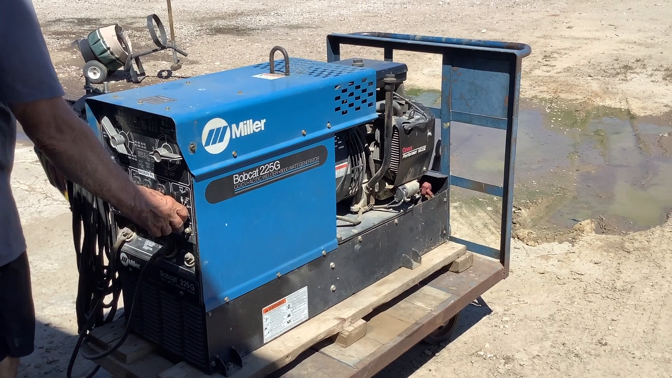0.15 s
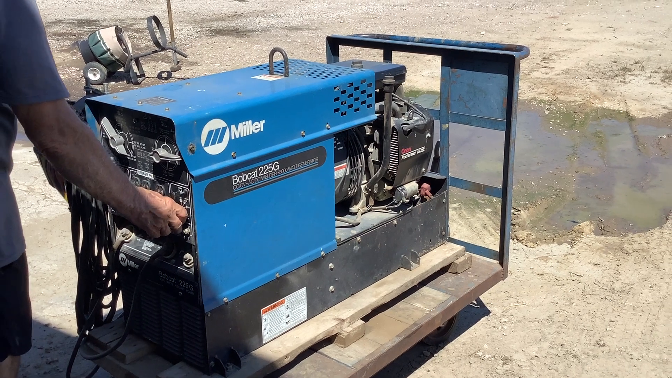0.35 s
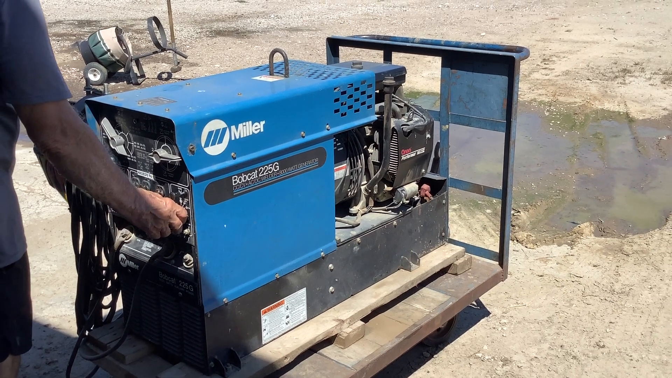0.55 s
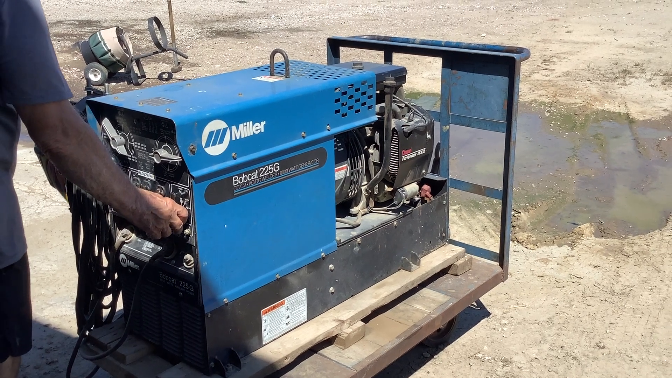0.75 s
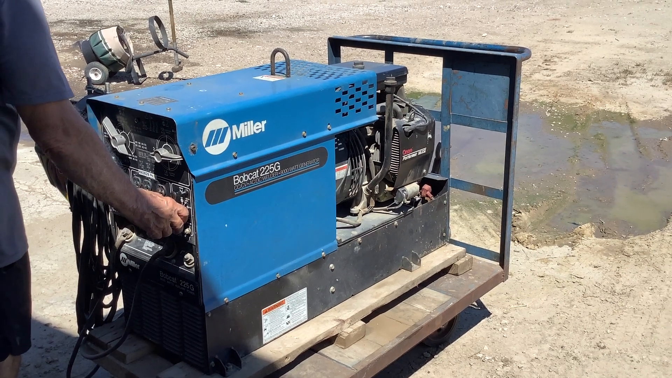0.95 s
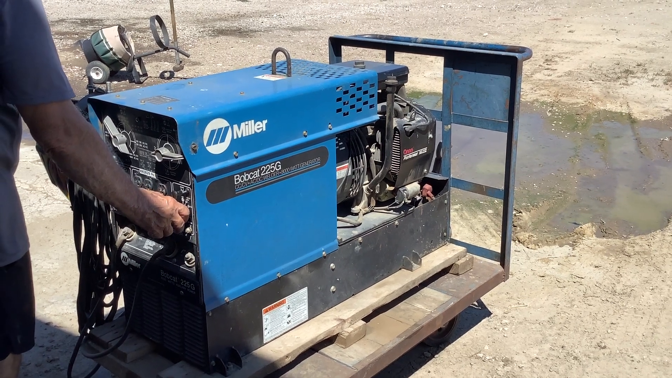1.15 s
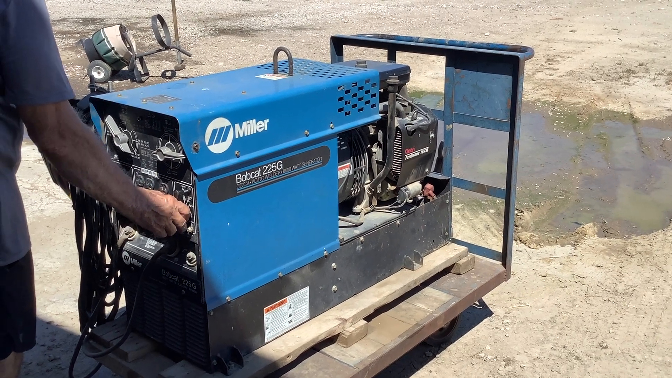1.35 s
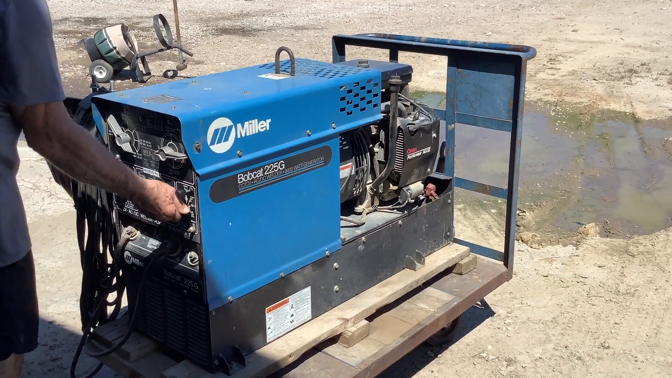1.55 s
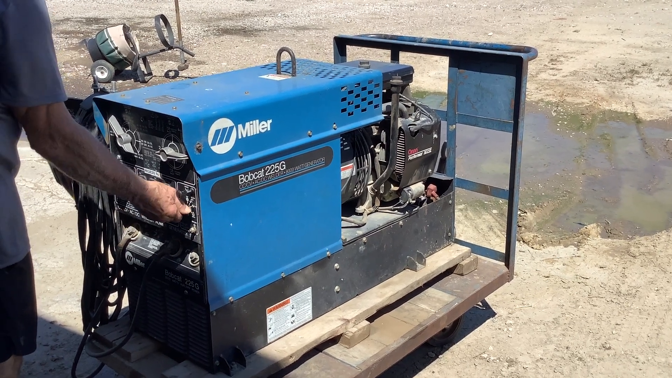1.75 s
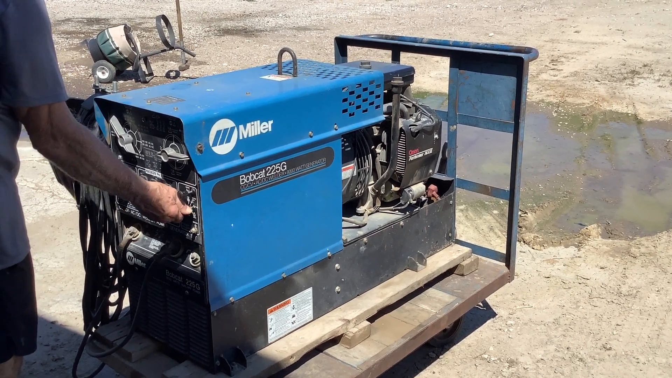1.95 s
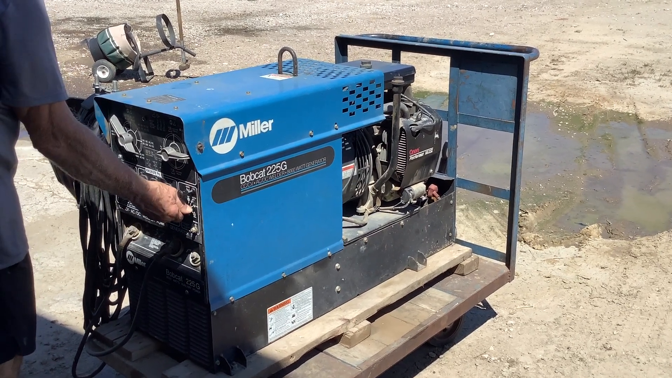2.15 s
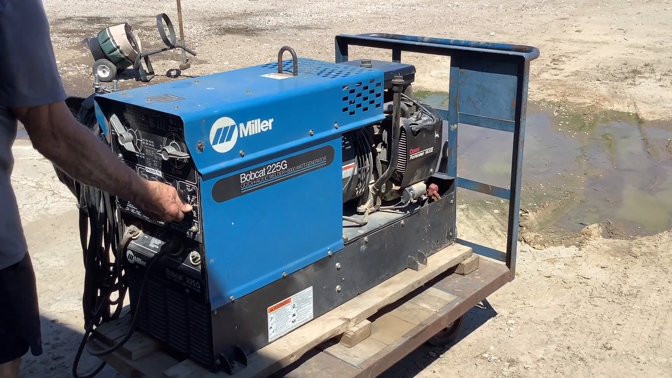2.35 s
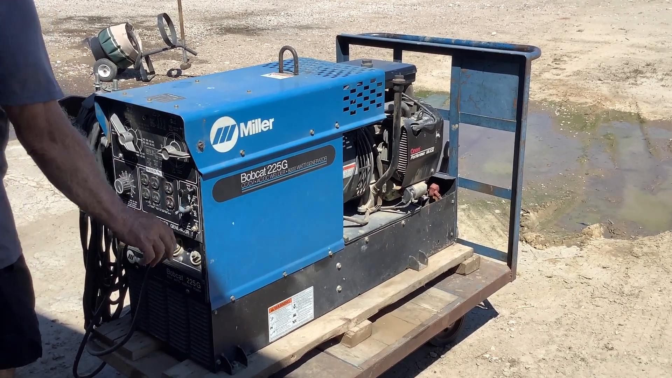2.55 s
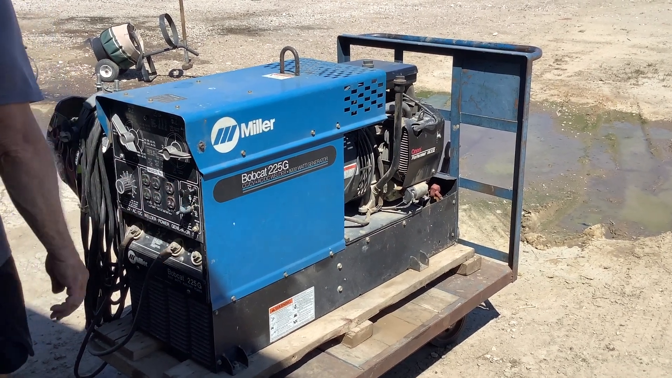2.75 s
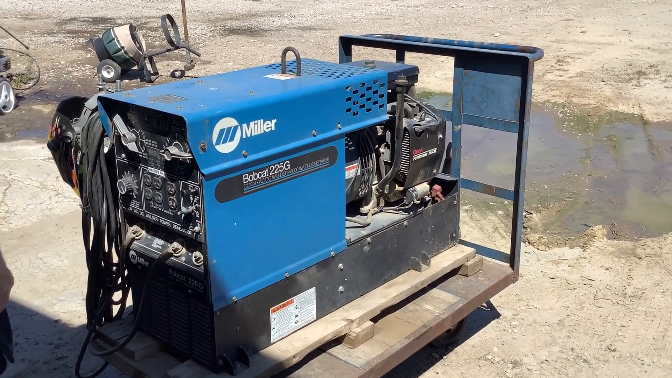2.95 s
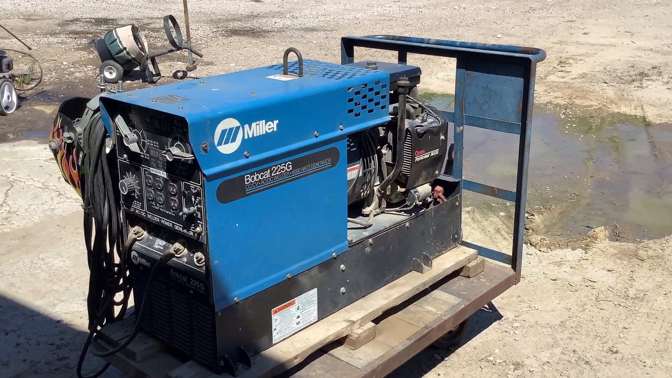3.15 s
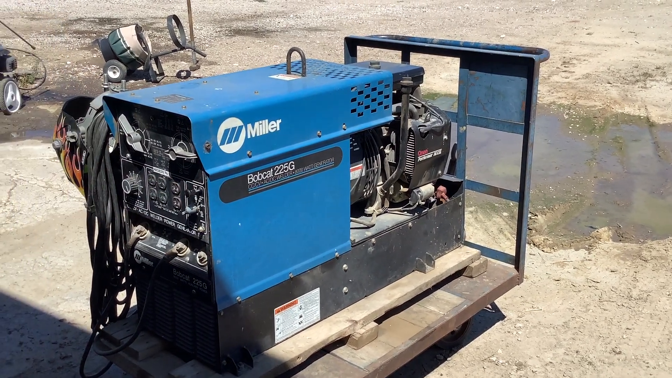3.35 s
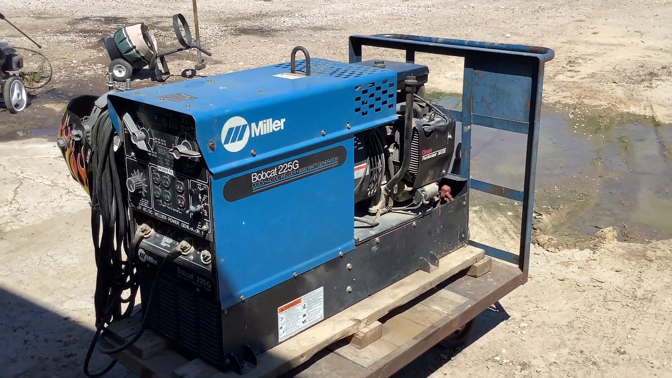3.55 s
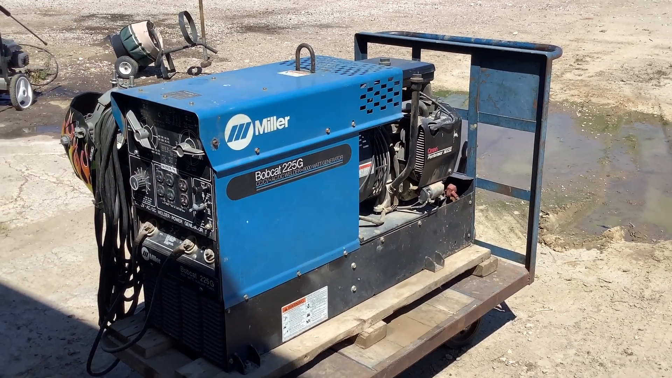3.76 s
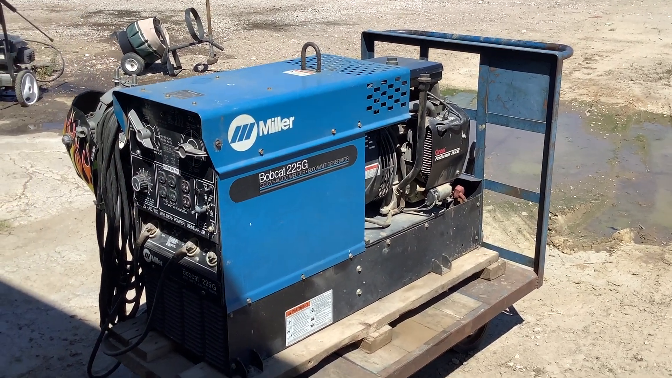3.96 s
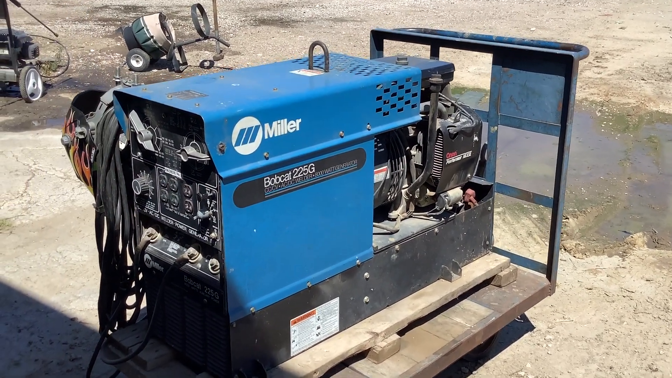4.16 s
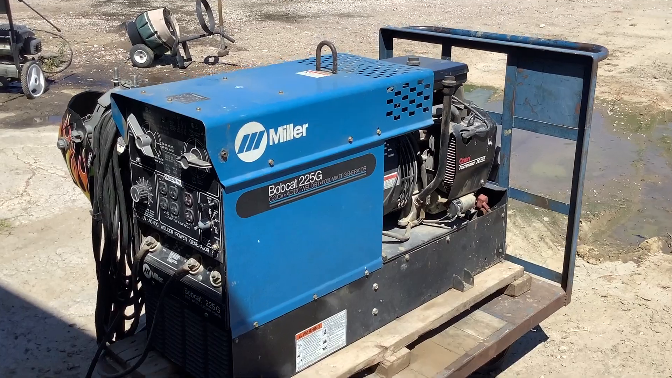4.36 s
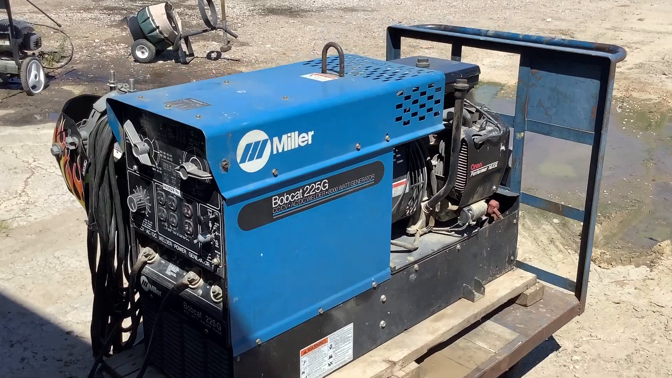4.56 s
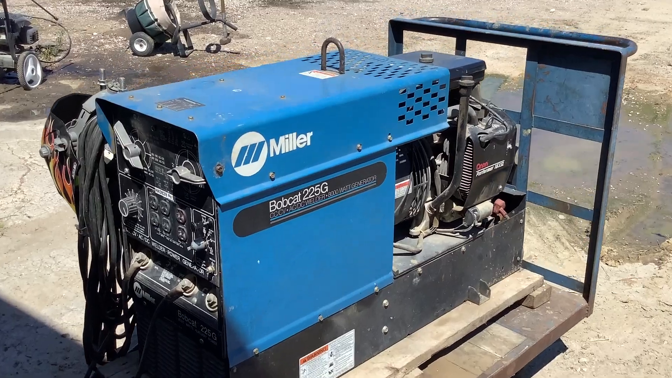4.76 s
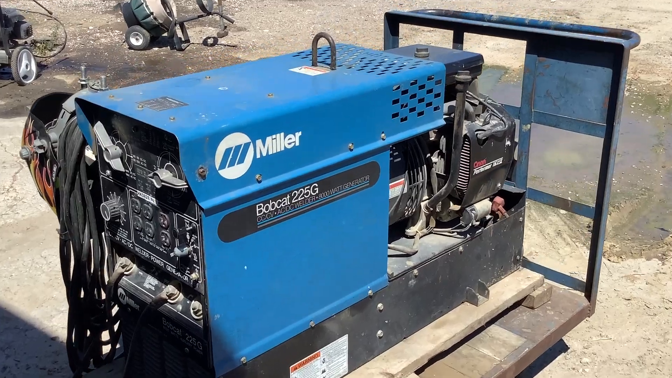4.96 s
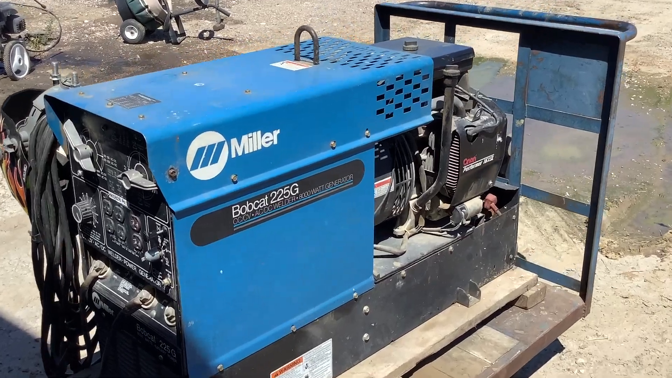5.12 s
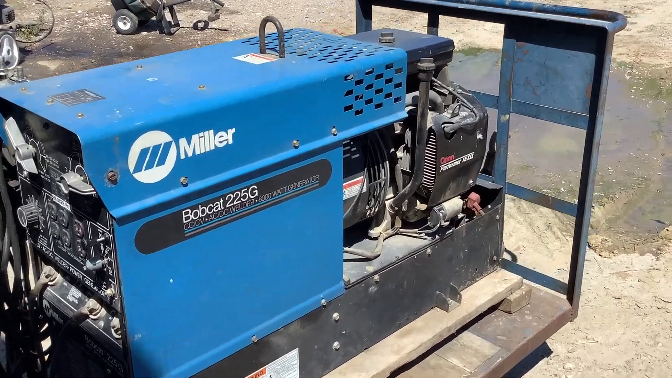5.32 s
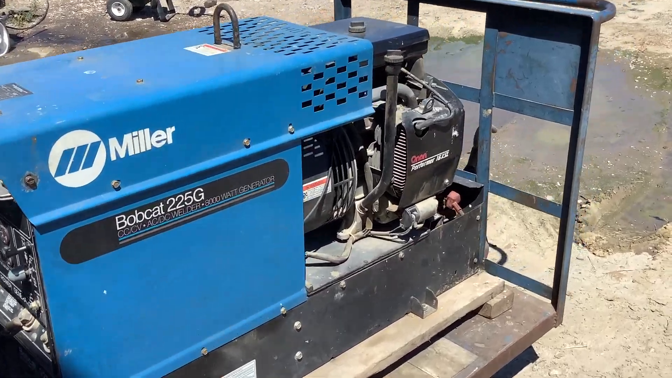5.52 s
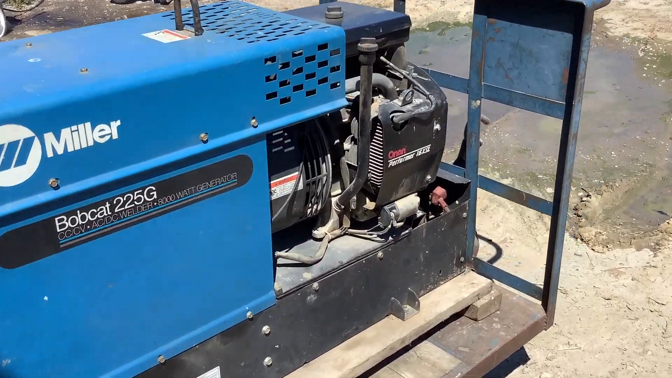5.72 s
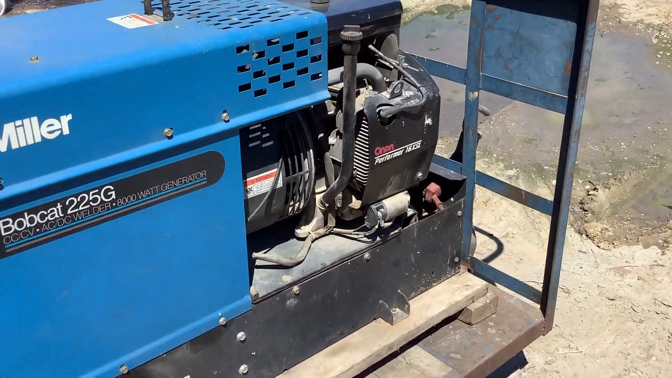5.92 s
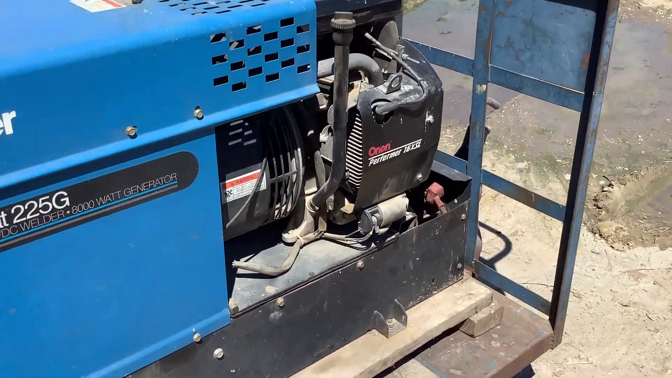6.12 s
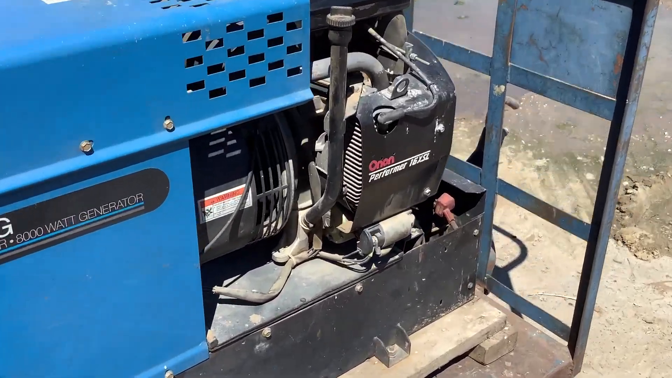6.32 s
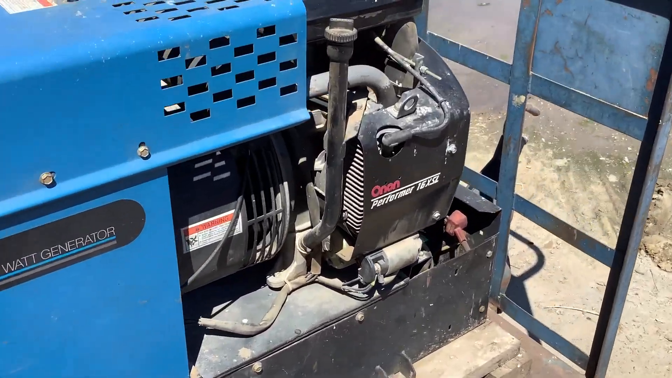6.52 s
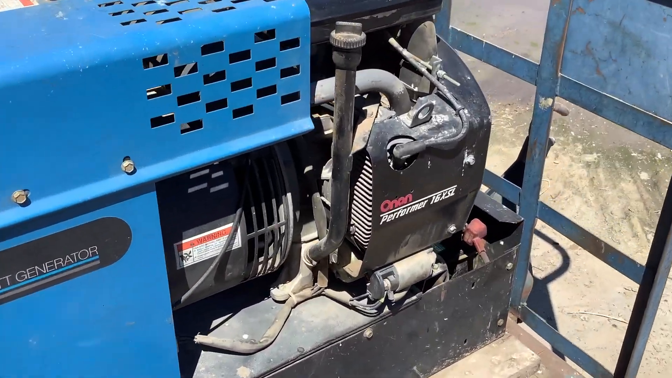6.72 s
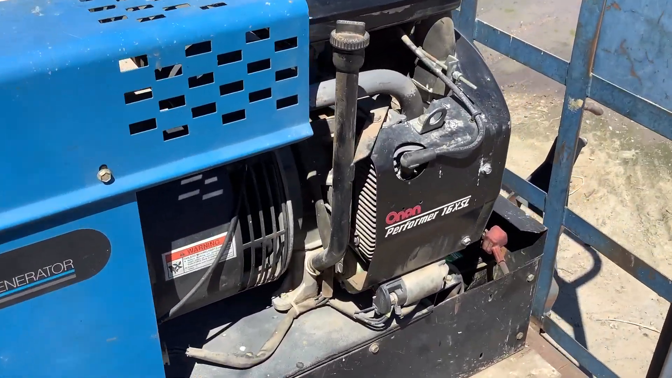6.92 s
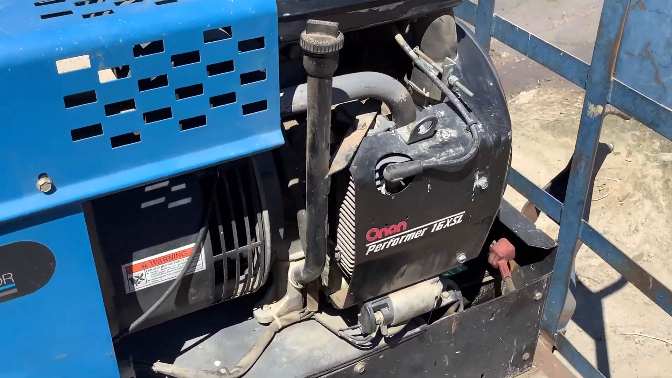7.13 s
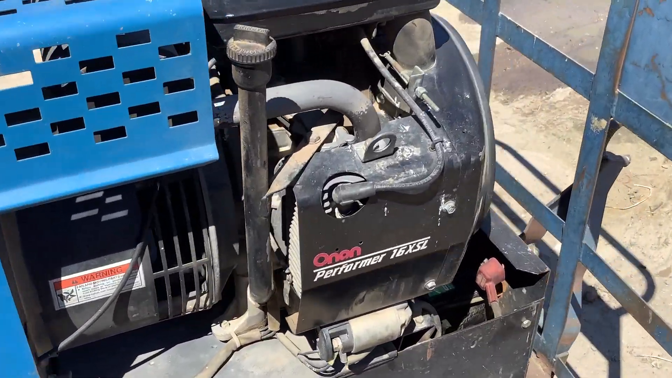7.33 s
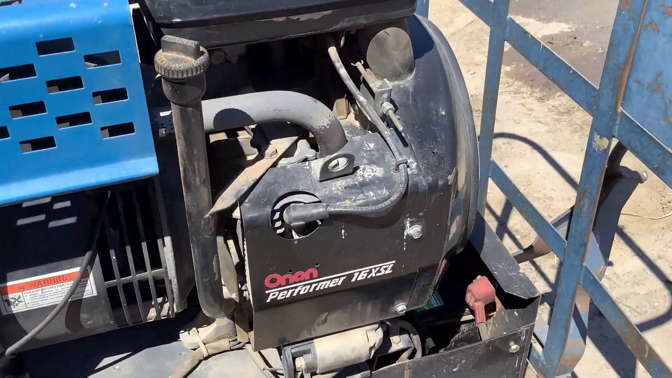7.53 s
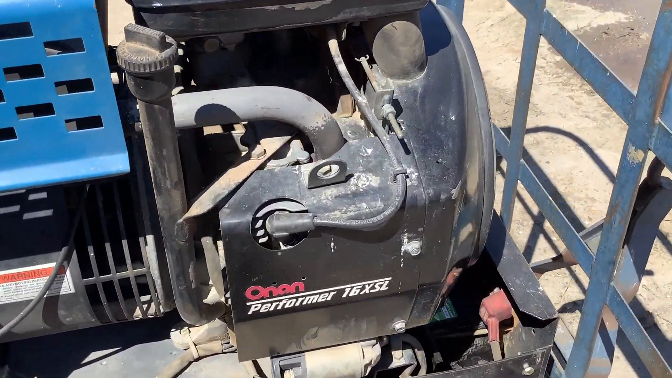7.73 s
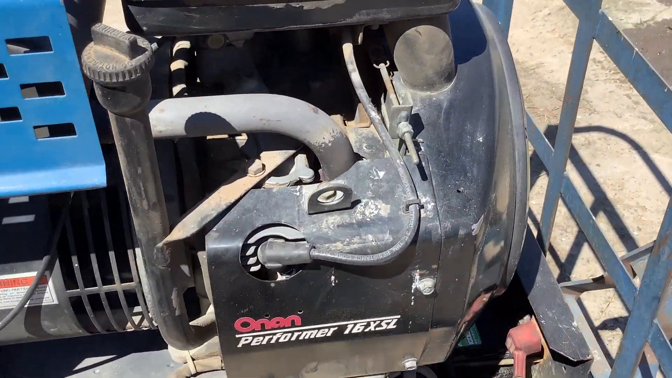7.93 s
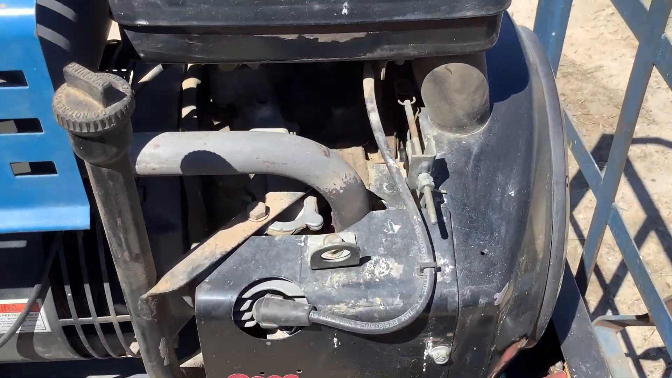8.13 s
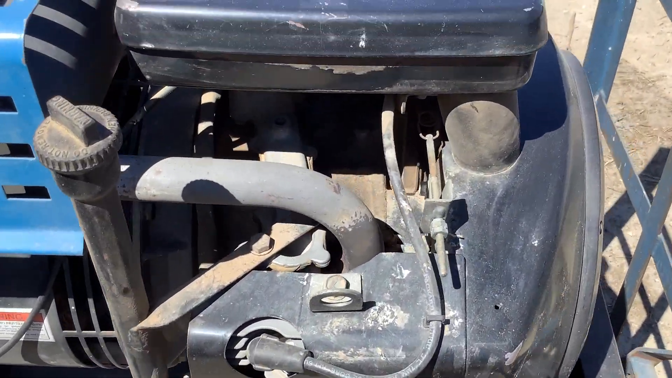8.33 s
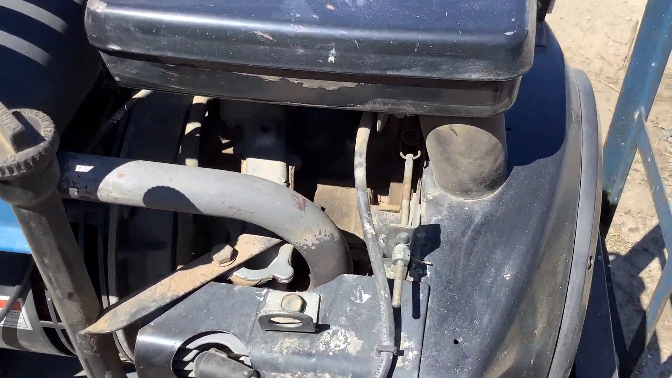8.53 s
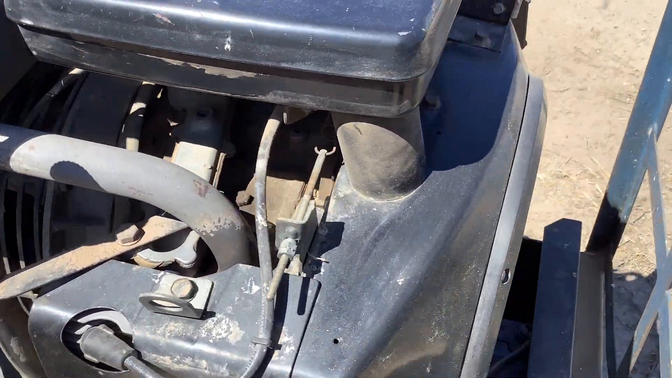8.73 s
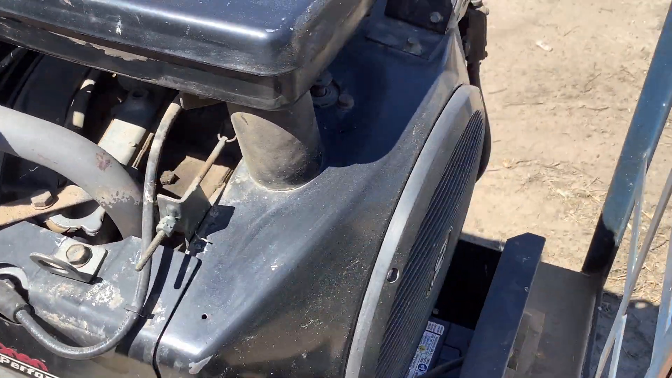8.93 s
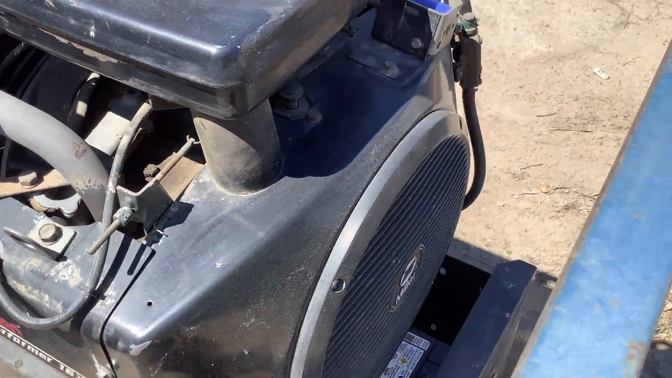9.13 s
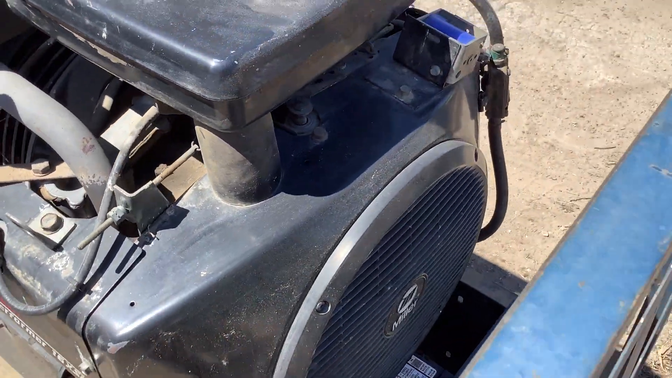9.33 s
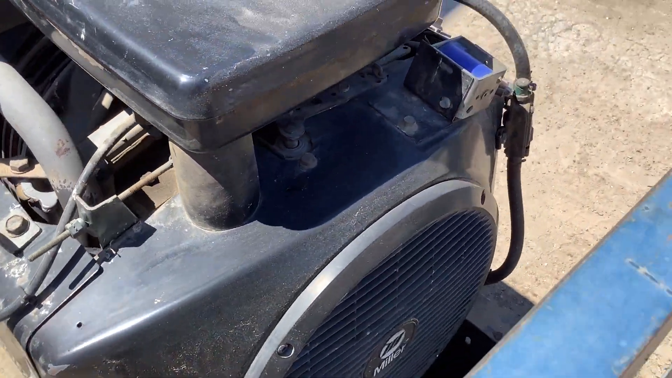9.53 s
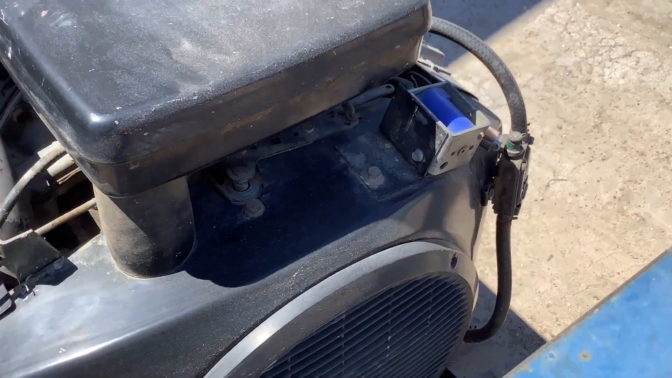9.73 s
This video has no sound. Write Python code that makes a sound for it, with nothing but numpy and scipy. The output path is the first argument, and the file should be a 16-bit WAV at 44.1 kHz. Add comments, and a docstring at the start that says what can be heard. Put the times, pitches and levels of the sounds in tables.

```python
"""A light breeze in an open yard, then a switch clicks on a petrol welding generator.
The starter pinion slams in, whines and grinds against the ring gear, and knocks over compression.
The two-cylinder engine catches with muffler thumps and runs up to governed speed: exhaust drone,
valve clatter, fan and hiss. It misses a few firings after the throttle closes, and runs on while
the listener walks up to it and round to the flywheel end."""
import sys
import numpy as np
from scipy import signal
from scipy.fft import rfft, irfft, next_fast_len
from scipy.io import wavfile
from scipy.ndimage import uniform_filter1d

SR = 44100
rng = np.random.default_rng(int(sys.argv[2]) if len(sys.argv) > 2 else 0)


def dump_mix(stems):
    """Bounce the given channels to the path in sys.argv[1] as a 16-bit WAV at rate SR."""
    frames = np.atleast_2d(stems).T  # one column per channel
    limited = np.clip(frames, -1, 1)  # hard clip at full scale
    pcm = np.round(limited * 32767).astype(np.int16)
    wavfile.write(sys.argv[1], SR, pcm)


N = 435708


def from_db(db):
    """Decibels to gain."""
    return 10 ** (np.asarray(db) / 20)


def rms_one(x):
    """Scale to rms 1."""
    return x / np.sqrt(np.mean(x ** 2) + 1e-20)


def clock():
    """Sample times in s."""
    return np.arange(N) / SR


def white():
    """White noise."""
    return rng.standard_normal(N)


def drift(rate_hz):
    """Random wander, rms 1."""
    return rms_one(np.interp(clock() * rate_hz, np.arange(4096), rng.standard_normal(4096)))


def ramp(mid_s, takes_s):
    """Linear move from 0 to 1."""
    return np.clip((clock() - mid_s) / takes_s + .5, 0, 1)


def hump(x, centre, half):
    """1 at centre, 0.5 at centre +/- half."""
    return 1 / (1 + ((x - centre) / half) ** 4)


def burst(start_s, db, rise_s, decay_s):
    """Linear attack, exponential decay."""
    age = clock() - start_s
    return from_db(db) * np.clip(age / rise_s, 0, 1) * np.exp(-np.clip((age - rise_s) / decay_s, 0, 20))


def colour(x, spectrum):
    """Shape by (f/Hz, relative level/dB) rows, steep beyond the ends; rms 1."""
    hz, db = np.transpose(spectrum)
    size = next_fast_len(N + SR // 10)
    f = np.arange(size // 2 + 1) * SR / size + 1e-3
    ends = 1 / np.sqrt((1 + (.8 * hz[0] / f) ** 8) * (1 + (.8 * f / hz[-1]) ** 8))
    gain = ends * from_db(np.interp(np.log(f), np.log(hz), db))
    return rms_one(irfft(rfft(x, size) * gain, size)[:N])


def resonate(x, modes):
    """Parallel resonators from (f/Hz, width/Hz, relative level/dB) rows; rms 1."""
    out = 0
    for k, (hz, width_hz, db) in enumerate(modes):
        r = np.exp(-np.pi * width_hz / SR)
        mode = signal.lfilter([1, 0, -1], [1, -2 * r * np.cos(2 * np.pi * hz / SR), r * r], x)
        out = out + (-1) ** k * from_db(db) * (1 - r * r) / 2 * mode
    return rms_one(out)


# air spectra: f/Hz, relative level/dB
YARD_SPECTRUM = [(60, -1), (200, -8.5), (500, -23), (1700, -30.5), (3000, -40.5), (5200, -34), (6500, -42),
                 (15000, -44.5)]
BREEZE_SPECTRUM = [(55, 3), (170, -0.5), (380, -13), (750, -29)]
# wind puffs: t/s, level/dB, half length/s
BREEZE_PUFFS = [(0.327, -45, 0.01), (0.357, -37.5, 0.006), (0.484, -49, .02), (0.566, -49, 0.024),
                (0.632, -47, 0.01), (0.797, -52, .014), (1.003, -54, .012), (1.43, -52, 0.11)]

def air(yard_db):
    """Quiet yard and a restless breeze with low puffs."""
    puffs = sum(from_db(db) * hump(clock(), s, half_s) for s, db, half_s in BREEZE_PUFFS)
    restless = from_db(-65.5 + 4 * drift(18))
    yard = from_db(yard_db) * colour(white(), YARD_SPECTRUM)
    return yard + (puffs + restless) * colour(white(), BREEZE_SPECTRUM)


# snap: f/Hz, width/Hz, peak level/dB
SWITCH_MODES = [(260, 130, -49), (665, 240, -18.5), (2350, 350, -46), (2930, 450, -14.5), (5500, 1500, -12),
                (7550, 1800, -13)]
# panel rattle: f/Hz, relative level/dB
PANEL_SPECTRUM = [(150, 1), (600, 2), (1600, -9), (2600, 0), (4000, -13), (8000, -10), (15000, -30)]

def switch(at_s, rattle_db, decay_s):
    """One snap, then a short rattle of the control panel."""
    age = np.clip(clock() - at_s, 0, 1)
    snap = sum(from_db(db) * np.sin(2 * np.pi * hz * age) * np.exp(-np.minimum(np.pi * width * age, 20))
               for hz, width, db in SWITCH_MODES)
    rattle = (age > 0) * np.exp(-age / decay_s) * colour(white(), PANEL_SPECTRUM)
    return snap + from_db(rattle_db) * rattle


# solenoid and pinion impacts: t/s, level/dB, decay/s
PINION_CLUNKS = [(1.43, -46.5, 0.047), (1.456, -46, 0.025), (1.507, -26, 0.034), (1.519, -13, 0.024),
                 (2.048, -7.5, 0.0079)]
ENGAGE_S = 1.52

def engagement(ring, crash):
    """The pinion slams in; the sudden torque rocks the engine on its mounts."""
    clunks = sum(burst(s, db, .0013, decay_s) for s, db, decay_s in PINION_CLUNKS)
    rumble = colour(white(), [(130, -7.5), (190, -14), (400, -9)])
    jolt = burst(ENGAGE_S, db=-24, rise_s=.022, decay_s=.097) * rumble
    return clunks * (.66 * crash + .23 * ring) + jolt


def compression(lead_s=0, times_s=(1.762, 1.975), width_s=.033):
    """Starter load, peaking at each compression."""
    return sum(np.exp(-((clock() + lead_s - s) / width_s) ** 2) for s in times_s)


# flywheel, ring gear and shroud: f/Hz, width/Hz, relative level/dB
FLYWHEEL_MODES = [(803, 27, 5.5), (1097, 16, 10), (1425, 28, 8), (1664, 85, 5.5), (2093, 58, 9),
                  (2367, 53, 7.5), (3830, 34, -9), (4600, 53, -4), (4690, 35, -7), (5000, 22, -6),
                  (7170, 640, -7.5), (12000, 200, -5.5)]
# metal crash: f/Hz, relative level/dB
CRASH_SPECTRUM = [(140, -9), (800, 1), (2300, -4), (2900, -5.5), (5200, 0.5), (6200, -20), (7300, -17),
                  (9000, -16), (12300, -13), (16000, -24)]
UNLOAD_S = 1.97

def starter(free_mesh_hz, spin_up_s, drag_share):
    """Gear teeth mesh and scrape, slowed by each compression, until firing unloads the pinion."""
    age = np.maximum(clock() - ENGAGE_S, 0)
    unloaded = ramp(UNLOAD_S, takes_s=.047)
    mesh_hz = free_mesh_hz * (1 - np.exp(-age / spin_up_s)) * (1 - drag_share * compression())
    mesh_rad = 2 * np.pi * np.cumsum(mesh_hz * (1 + .009 * drift(150))) / SR
    whine = gear_whine(mesh_rad, age, db=-23.5, attack_s=.15) * (1 - unloaded)
    scrape = white() * from_db(2.2 * np.cos(mesh_rad) + 1.3 * drift(200))
    ring, crash = resonate(scrape, FLYWHEEL_MODES), colour(scrape, CRASH_SPECTRUM)
    grind = gear_grind(mesh_rad, age, unloaded, ring, db=-20, attack_s=.098, coast_db_per_s=51)
    return engagement(ring, crash) + whine + grind + backlash(ring, crash)


def gear_whine(mesh_rad, age, db, attack_s):
    """Mesh harmonics, each flaring as it sweeps through a flywheel mode."""
    tone = rms_one(sum(from_db(harmonic_db) * np.sin(k * mesh_rad + 2 * np.pi * rng.random())
                       for k, harmonic_db in enumerate([-11, 0, -2, -3], 1)))
    attack = np.minimum(age / attack_s, 1) ** 3
    return from_db(db) * attack * (.8 * tone + .15 * resonate(tone, FLYWHEEL_MODES))


def gear_grind(mesh_rad, age, unloaded, ring, db, attack_s, coast_db_per_s):
    """Teeth rasp on the ring gear, hardest just before compression, dying away once unloaded."""
    teeth = rms_one(np.diff(np.floor(mesh_rad / (2 * np.pi)), prepend=0))
    strikes = teeth * from_db(2 * drift(400)) * (1 - unloaded)
    screech = resonate(strikes + .61 * white(), [(4440, 560, 0)]) * (1 - .79 * unloaded)
    rasp = from_db(-4) * ring + from_db(-5.5) * colour(white(), CRASH_SPECTRUM) + from_db(-6.5) * screech
    load_db = 4.5 * compression(lead_s=.023) - 3.5 * unloaded
    coast_db = coast_db_per_s * np.maximum(clock() - UNLOAD_S, 0)
    return from_db(db + load_db - coast_db) * np.minimum(age / attack_s, 1) * rasp


# gear knocks: t/s, level/dB
BACKLASH_KNOCKS = [(2.061, -17.5), (2.166, -19), (2.239, -22.5), (2.312, -21), (2.374, -18.5),
                   (2.439, -19.5)]

def backlash(ring, crash):
    """The gears knock in their play as the engine goes over compression."""
    knocks = sum(burst(s, db, rise_s=.0084, decay_s=.027) for s, db in BACKLASH_KNOCKS)
    return knocks * (1.06 * ring + .5 * crash)


# crank speed: t/s, f/Hz
CRANK_SPEED = [(2.0, 8.02), (2.13, 10.6), (2.48, 20.0), (3.05, 34.2), (3.29, 40.4), (3.51, 45.8),
               (3.99, 55.8), (4.49, 64.0), (4.71, 63.1), (4.97, 60.3), (9.85, 60.5)]

def engine(first_firing_s):
    """The crank runs up and drives every part; the balance shifts as the listener walks."""
    t = clock()
    crank_hz = np.interp(t, *np.transpose(CRANK_SPEED))
    pace = crank_hz / crank_hz.max()
    turns = np.cumsum(crank_hz * (1 + .003 * drift(12)) * (t > first_firing_s)) / SR
    firing = np.cos(2 * np.pi * turns)
    throttle = 1 - ramp(4.4, takes_s=.4)  # governor closes it
    surge = burst(3.44, db=0, rise_s=.33, decay_s=.45)  # rush of air at the hardest pull
    near, at_end = ramp(5.33, takes_s=.64), ramp(9, takes_s=.64)  # up close, then at the flywheel end

    def level(db, doubling_db, surge_db, near_db, end_db):
        """Full-speed level, shifted per doubling of speed, by the surge and by position."""
        speed_db = doubling_db * np.log2(np.maximum(pace, .33))
        return from_db(db + speed_db + surge_db * surge + near_db * near + end_db * at_end)
    knock = blows(turns, per_cycle=14, jitter_s=.0003, uneven_db=3, decay_s=.003)
    parts = (clatter(knock, level) + covers(knock, level) + fan(firing, level)
             + hiss(knock, firing, pace, level) + casing(knock) + flywheel_air(at_end)
             + intake(knock, crank_hz, pace, db=-21.5) + chugs(turns, db=-23.5)
             + exhaust(turns, crank_hz, pace, throttle, near) + misfires(turns))
    return np.interp(t, [1.9, 2.02, 2.45], [0, .7, 1]) * parts


def chugs(turns, db):
    """The first slow firings thump in the muffler, then fade into the drone."""
    puffs = np.diff(np.ceil(turns), prepend=0) * from_db(2 * drift(22.1))
    boom = resonate(puffs, [(67, 10, -2), (138, 27, -11), (322, 100, -20)])
    return from_db(db) * np.interp(clock(), [2.7, 3.3], [1, 0]) * boom


def blows(turns, per_cycle, jitter_s, uneven_db, decay_s):
    """Valves, pistons and exhaust strike at set angles of the two-turn cycle, each with its own ring."""
    out = 0
    age = np.arange(SR // 20) / SR
    cycles = np.arange(int(turns[-1] / 2) + 1)
    for share in (np.arange(per_cycle) + rng.random(per_cycle)) / per_cycle:
        timing, strength = rng.standard_normal((400, 2))[cycles].T
        at_s = np.interp(2 * (cycles + share), turns, clock()) + jitter_s * timing
        clicks = np.bincount(np.clip(at_s * SR, 0, N - 1).astype(int), from_db(uneven_db * strength), N)
        ring = rng.standard_normal(len(age)) * np.exp(-age / decay_s)
        out = out + signal.oaconvolve(clicks, ring)[:N]
    return rms_one(out)


# mechanical noise: f/Hz, relative level/dB
CLATTER_SPECTRUM = [(130, -3), (270, 3), (400, 0), (560, 4.5), (900, -1.5), (1600, -2), (2400, -15),
                    (5500, -28)]

def clatter(knock, level):
    """The blows heard as broadband clatter."""
    gain = level(-26, doubling_db=4.5, surge_db=-1.5, near_db=4, end_db=-1.8)
    return gain * colour(knock, CLATTER_SPECTRUM)


# sheet metal: f/Hz, width/Hz, relative level/dB
COVER_MODES = [(713, 130, 6.5), (2093, 61, 4), (4470, 14, 0.5), (4660, 70, -4.5), (5031, 29, -4)]

def covers(knock, level):
    """The covers ring under the blows."""
    gain = level(-26, doubling_db=2, surge_db=-.5, near_db=-7, end_db=2)
    return gain * resonate(knock + white(), COVER_MODES)


# cooling air: f/Hz, relative level/dB
FAN_SPECTRUM = [(45, -12), (90, -5.5), (150, 2), (330, 4), (1000, 2), (1700, -1), (2050, -0.5), (2400, -13)]

def fan(firing, level):
    """Cooling fan rush, rising steeply with speed."""
    gain = level(-18.5, doubling_db=10.5, surge_db=3.5, near_db=-2, end_db=-3.5)
    return gain * colour(white() * from_db(.25 * firing + 1.1 * drift(300)), FAN_SPECTRUM)


# engine hiss: f/Hz, relative level/dB
HISS_SPECTRUM = [(2000, -25), (2600, 0.5), (3700, -1), (5500, 0.5), (6300, -8.5), (7100, -6), (8000, -9.5),
                 (11000, -9), (16000, -16.5)]

def hiss(knock, firing, pace, level, split_hz=6500):
    """Two bands of hiss swell with every firing, more deeply at low speed."""
    noise = white() + .22 * knock
    swell_db = (.64 + 3.1 * (1 - pace)) * firing + .81 * drift(60)
    puffs = colour(noise * from_db(swell_db), HISS_SPECTRUM)
    top = signal.sosfiltfilt(signal.butter(2, split_hz, "high", fs=SR, output="sos"), puffs)
    return (level(-27.5, doubling_db=4.5, surge_db=6.5, near_db=2.5, end_db=-2.2) * (puffs - top)
            + level(-28, doubling_db=1.6, surge_db=9.5, near_db=.45, end_db=-.5) * top)


def crank_line(turns, order, waver_db):
    """Sine at a multiple of crank speed, with a wavering level."""
    return np.sqrt(2) * np.sin(2 * np.pi * (order * turns + rng.random())) * from_db(waver_db * drift(25))


# strong lines, each peaking at one place on the walk: crank order, level/dB, per speed doubling/dB,
# open throttle/dB, close up/dB, pass t/s, pass half length/s, pass boost/dB
EXHAUST_LINES = [(1, -22.5, 5, 6.5, -0.5, 5.6, 0.39, 2.5), (2, -36, 1.5, 10.5, -6.5, 8.8, 2.5, 16.5),
                 (3, -27, -2.5, -1.5, 5.5, 6.3, 0.83, 2), (8, -39, 8.5, 7.5, 2, 6.94, 0.92, 11.5)]
# weak lines at full speed: crank order, level/dB
EXHAUST_OVERTONES = [(4, -30), (5, -33.5), (6, -35), (12, -32)]
# pipe resonances: f/Hz, half width/Hz, boost/dB
PIPE_MODES = [(102.3, 8.3, 4), (447, 21, 9)]

def exhaust(turns, crank_hz, pace, throttle, near, muffler_low_hz=59.1):
    """Crank orders through the muffler; the strong ones swell as they cross pipe resonances."""
    strong = 0
    waver_db = .5 + 1.3 * throttle  # uneven combustion
    for order, db, doubling_db, throttle_db, near_db, pass_s, half_s, pass_db in EXHAUST_LINES:
        hz = order * crank_hz
        muffler = 1 / np.sqrt(1 + (muffler_low_hz / hz) ** 12)
        pipe_db = sum(boost_db * hump(hz, centre, half) for centre, half, boost_db in PIPE_MODES)
        place_db = near_db * near + pass_db * hump(clock(), pass_s, half_s)
        effort_db = doubling_db * np.log2(pace) + throttle_db * throttle
        gain = muffler * from_db(db + effort_db + pipe_db + place_db)
        strong = strong + gain * crank_line(turns, order, waver_db)
    weak = sum(from_db(db) * crank_line(turns, order, waver_db=0) for order, db in EXHAUST_OVERTONES)
    return strong + pace ** 1.13 * weak


def intake(knock, crank_hz, pace, db):
    """The open throttle lets the intake growl while the engine gains speed."""
    acceleration = uniform_filter1d(np.gradient(crank_hz), size=SR // 3)
    opening = np.clip(acceleration / acceleration.max(), 0, 1)
    return from_db(db) * opening * pace * resonate(knock, [(159, 53, -1.9), (282, 110, .87)])


# missed firings: start t/s, end t/s, level/dB
MISFIRE_BOOMS = [(4.69, 4.91, -22.5), (5.925, 5.95, -17), (6.397, 6.415, -23)]

def misfires(turns, edge_s=.033):
    """With one cylinder out the beat halves: order 1.5 booms in the muffler."""
    gain = sum(from_db(db) * np.minimum(ramp(start_s, edge_s), 1 - ramp(end_s, edge_s))
               for start_s, end_s, db in MISFIRE_BOOMS)
    return gain * crank_line(turns, order=1.5, waver_db=.7)


def casing(knock):
    """The hollow under the hood, then the side of the casing, ring as the listener passes."""
    side = hump(clock(), 6.3, 1.24) * resonate(knock + white(), [(1442, 50, -1), (1683, 92, 4)])
    hollow = hump(clock(), 5.9, .38) * resonate(knock, [(553, 53, 0)])
    return from_db(-28) * (hollow + side)


def flywheel_air(at_end):
    """At the far end, air hisses through the flywheel screen and roars in the shroud."""
    screen = colour(white(), [(8000, -2), (10500, -2), (11500, -2), (12500, -25)])
    roar = resonate(white(), [(392, 200, 0)])
    return from_db(-38) * hump(clock(), 8.7, 1) * screen + from_db(-27.5) * at_end * roar


def scene():
    """Generator and yard, mono."""
    machine = engine(first_firing_s=2.018) + starter(free_mesh_hz=660, spin_up_s=.185, drag_share=.2)
    return (machine + switch(at_s=.1813, rattle_db=-38.5, decay_s=.028) + air(yard_db=-61))[None]


def record(dry):
    """Soft clip, then low-pass."""
    cutoff_hz = 15800
    return signal.sosfilt(signal.ellip(10, .1, 80, cutoff_hz, fs=SR, output="sos"), np.tanh(dry))


dry = scene()
out = record(dry)
dump_mix(out)
```